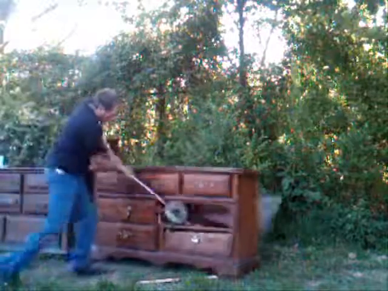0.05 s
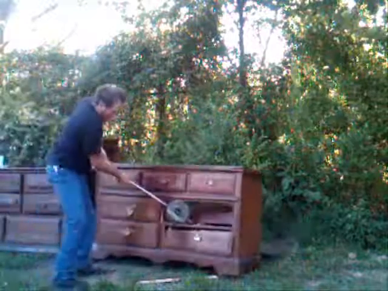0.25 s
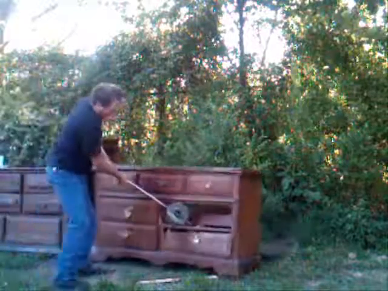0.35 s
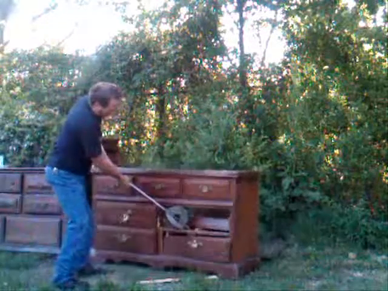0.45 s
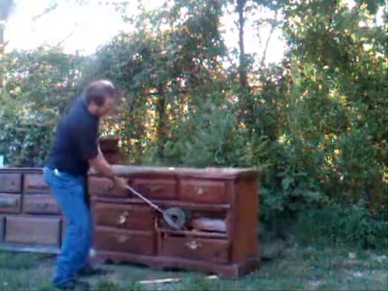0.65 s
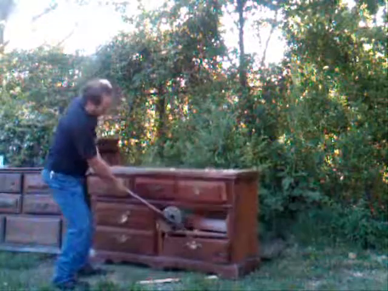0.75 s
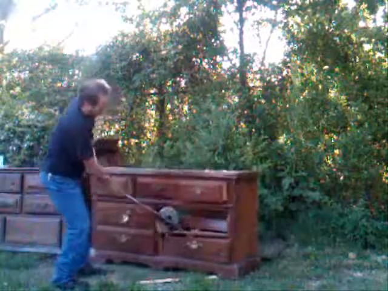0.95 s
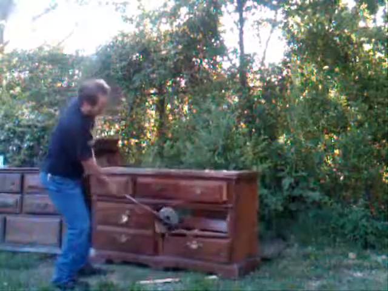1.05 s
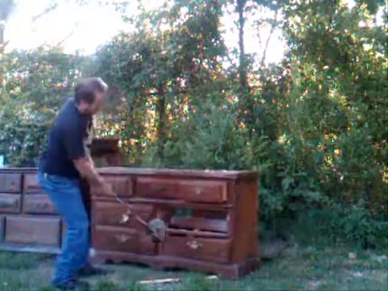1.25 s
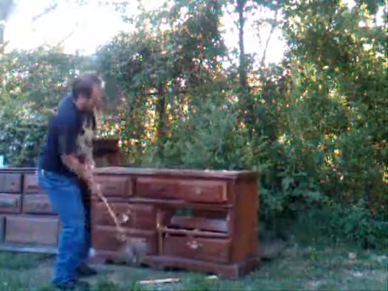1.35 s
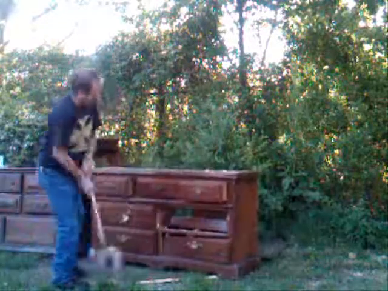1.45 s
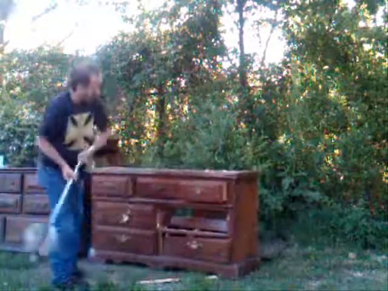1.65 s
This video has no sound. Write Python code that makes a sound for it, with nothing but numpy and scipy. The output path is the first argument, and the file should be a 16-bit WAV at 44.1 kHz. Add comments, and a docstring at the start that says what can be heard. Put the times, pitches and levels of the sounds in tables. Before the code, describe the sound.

At about 0.2 seconds a mace smashes into a wooden dresser with a sharp, splintering crack and a hollow boom. From 0.3 to 1.5 seconds the head is worked loose: quieter, uneven scraping with snapping splinters and knocking boards, busiest around 0.8 to 1 second. The steel clinks lightly once near 1.4 seconds. The backyard behind is very quiet.

```python
"""Steel mace on a wooden dresser

A mace smashes into a dresser in a backyard: the drawer front fractures in a run of noise bursts,
the panels ring in their modes and the hollow carcass booms. As the head is worked loose it scrapes
by stick-slip friction, splinters snap, boards knock and the steel clinks once.
A short echo follows the dresser's sounds; a faint bird and a low mains hum lie behind."""
import sys
import numpy as np
from scipy import signal
from scipy.fft import rfft, irfft, next_fast_len
from scipy.io import wavfile
from scipy.ndimage import uniform_filter1d, map_coordinates

SR = 44100
rng = np.random.default_rng(int(sys.argv[2]) if len(sys.argv) > 2 else 0)


def wav_record(signal):
    """Record a signal, one row per channel, as 16-bit PCM in the file named by sys.argv[1]."""
    frames = np.transpose(np.atleast_2d(signal))
    bounded = np.clip(frames, -1, 1)
    # unit amplitude maps onto the largest positive 16-bit level
    quanta = np.round(bounded * 32767).astype(np.int16)
    wavfile.write(sys.argv[1], SR, quanta)


N = 74970
T = np.arange(N) / SR

# wood fracturing under the blow: start_s, level_db, treble_db, t60_s
FRACTURES = [(0.1963, -49.5, -12, .07), (0.1983, -47, 4, .05), (.2016, -28.5, -12, 0.047),
             (0.2036, -22, 8, 0.048), (0.209, -27, 8.5, 0.02), (.214, -36.5, -8.5, .07),
             (0.2208, -37, -4, 0.039), (.227, -29.5, -4.5, 0.054), (0.233, -41.5, 5.5, .07),
             (0.242, -40.5, -21.5, 0.12), (0.25, -44, 7, 0.074), (.265, -38.5, -3, 0.096),
             (0.272, -49.5, 17, 0.03), (.285, -48, -15, 0.085), (.307, -46, -21, 0.048)]
# modes of the dresser panels: pitch_hz, relative_db, t60_s
PANEL_MODES = [(190.7, -3, 0.25), (240.6, -5, .3), (804, -1, .3), (895, -5, 0.29), (1085, -5.5, 0.12),
               (1152, -12, .22), (1238, -5.5, 0.27), (1612, 1.5, 0.29), (1894, -3, .18), (2029, -11.5, .22),
               (2280, 4, 0.25), (2560, -11, .2), (2810, -9, 0.44), (2890, -13.5, 0.14), (3660, -4, 0.29),
               (4620, 1.5, 0.18), (4700, -10, .14), (5140, -3, 0.094)]
# booms of the carcass: start_s, level_db, pitch_hz, t60_s
THUMPS = [(.202, -42, 200, 0.067), (0.225, -31.5, 112, 0.06), (0.227, -41, 190, 0.21),
          (0.344, -54, 161, 0.08), (0.434, -69, 168, 0.071), (0.464, -53, 218, 0.13),
          (0.516, -57, 224, 0.15), (0.552, -54.5, 110, 0.14), (0.831, -51.5, 195, 0.25),
          (.885, -45, 165, .09), (1.059, -63, 61.4, 0.18), (1.191, -65, 187, .15), (1.227, -53, 220, 0.12),
          (1.232, -65, 59.5, 0.21), (1.334, -65, 178.3, .15), (1.253, -56, 177, 0.087),
          (1.284, -56.5, 201, 0.14), (1.443, -47, 215, 0.035)]
# loose boards knocking: start_s, level_db, centre_hz, t60_s
KNOCKS = [(0.024, -52, 1890, 0.007), (.208, -40.5, 395, 0.064), (.272, -35, 2600, 0.035),
          (.3302, -45, 1550, .045), (.3302, -48, 3000, .045), (.427, -49, 910, 0.068),
          (0.496, -43, 2170, 0.015), (.497, -52.5, 485, 0.27), (.517, -52.5, 520, 0.12),
          (0.659, -56, 415, .08), (0.67, -43, 1550, 0.031), (0.687, -45.5, 1440, 0.059),
          (.691, -49.5, 950, 0.047), (.715, -52, 2480, 0.049), (0.761, -56, 2400, .05),
          (.783, -57.5, 1280, 0.15), (.830, -42.5, 2650, 0.063), (0.841, -48.5, 1120, 0.084),
          (.885, -50.5, 470, 0.084), (.967, -49, 1180, 0.12), (0.981, -46, 1400, 0.057),
          (.984, -45, 2300, 0.045), (.9855, -52, 3200, 0.048), (0.991, -45, 1180, 0.036),
          (1.013, -55, 1390, .05), (1.005, -57, 680, 0.17), (1.007, -58.5, 378, 0.29),
          (1.078, -55, 1350, .08), (1.082, -61, 850, .09), (1.243, -49.5, 975, 0.056),
          (1.265, -52, 970, 0.068), (1.306, -55.5, 1190, 0.034), (1.332, -56.5, 2350, 0.031),
          (1.344, -60.5, 450, 0.11), (1.4207, -55, 2570, 0.031), (1.424, -57, 926, 0.14),
          (1.440, -61, 430, 0.12), (1.448, -50, 920, 0.047), (1.501, -52, 1830, 0.025)]
# splinters snapping: start_s, level_db, treble_db
SNAPS = [(.392, -57, -4), (0.424, -47, 5), (0.437, -54, -21), (.446, -53, 1), (.469, -44.5, 1),
         (.477, -65.5, 2), (0.489, -49, 5.5), (0.512, -48, -1), (0.565, -55, -7), (.609, -52, -4),
         (.723, -58, 1), (.830, -45, -5.5), (.837, -51, -2), (.859, -49.5, 9), (0.873, -49, -6),
         (0.9436, -47, 5), (.956, -54, -6), (1.044, -66, 3), (1.063, -58.5, 1), (1.111, -82, 11),
         (1.179, -63, 0), (1.186, -63, 1), (1.203, -65, 2), (1.228, -49.5, 11), (1.236, -47, 2),
         (1.244, -52, 6), (1.252, -67, 5), (1.270, -50, -3), (1.355, -54.5, -3), (1.393, -56, -1),
         (1.422, -52, 4), (1.441, -58.5, 23), (1.4855, -54.5, 7.5), (1.500, -59, -6), (1.533, -59.5, 2)]
# modes of the mace head: pitch_hz, level_db, t60_s
STEEL_MODES = [(3400, -62, 0.12), (6500, -66, 0.28), (6700, -65.5, 0.31)]
# envelopes of the scrape, the swing and the hum: time_s, relative_db
SCRAPE_ENVELOPE = [(.21, -63), (.28, -53), (.32, -59), (.37, -60.5), (.415, -58.5), (.44, -50.5),
                   (.52, -54), (.59, -61), (.65, -63.5), (.71, -62), (.745, -66), (.81, -60), (.85, -58),
                   (.89, -55), (.93, -60.5), (.99, -57), (1.05, -66.5), (1.09, -62.5), (1.16, -70.5),
                   (1.19, -57.5), (1.22, -66.5), (1.255, -57), (1.30, -64), (1.40, -67), (1.45, -61.5),
                   (1.48, -72), (1.56, -72), (1.61, -104)]
SWING_ENVELOPE = [(0, -89), (.08, -86.5), (.13, -74), (.175, -78.5), (.195, -119)]
HUM_ENVELOPE = [(0, -1), (1.45, -5), (1.6, -11)]
# spectra of breaking wood, splinters, rubbing and yard air: frequency_hz, relative_db
FRACTURE_SPECTRUM = [(80, -8), (230, -2.5), (310, -1.5), (520, -6.5), (1000, -0.5), (2000, 0), (2600, 1.5),
                     (3900, -4), (4700, -4), (5500, -4), (7000, -3)]
SPLINTER_SPECTRUM = [(80, -17), (250, 2), (1000, -11), (2500, -1.5), (3800, -8.5), (5000, -9.5),
                     (7200, -12.5)]
RUBBING_SPECTRUM = [(40, -6), (65, -4.5), (100, 1), (180, 8), (300, 5), (500, 3.5), (1300, 2.5), (2400, -1),
                    (3800, -6), (5000, -5), (7200, -9)]
AIR_SPECTRUM = [(25, -6), (60, 4), (130, -11), (300, -13.5), (600, -22), (1300, -19.5), (3000, -20.5),
                (7200, -21)]
# decay of the echo: frequency_hz, t60_s
ECHO_DECAY = [(150, 0.39), (1500, 0.23), (7000, 0.31)]
# harmonics of the mains: pitch_hz, relative_db
HUM_HARMONICS = [(59.5, -77), (119, -73), (178.5, -79), (238, -88)]
# bird chirps: start_s, length_s, from_hz, to_hz, level_db
CHIRPS = [(0.037, 0.044, 2470, 2010, -79.5), (.155, 0.014, 2250, 2400, -96.5)]

TREBLE_HZ, TOP_HZ = 3240, 7350  # where the treble begins; upper band limit


def smash(panel_db=-45.5):
    """Brittle fracture: the drawer front fails in quick bursts that excite the panel modes."""
    out = np.zeros(N)
    for start_s, db, treble_db, t60 in FRACTURES:
        add(out, start_s, amp(db) * crack(FRACTURE_SPECTRUM, treble_db, t60))
    add(out, FRACTURES[1][0], amp(panel_db) * ring(PANEL_MODES))
    return out


def carcass():
    """Damped oscillation: each shove makes the hollow body boom at one low pitch."""
    out = np.zeros(N)
    for start_s, db, hz, t60 in THUMPS:
        add(out, start_s, sine(hz, db) * fade(T, t60) * rise(T, attack_s=.0021))
    return out


def boards(q=4.5):
    """Resonance: each knocked board filters a noise burst around its own natural frequency."""
    out = np.zeros(N)
    for start_s, db, hz, t60 in KNOCKS:
        def response(f):
            resonance = 1j * f / (hz * hz - f * f + 1j * f * hz / q)
            return resonance / (1 + (f / (2.1 * hz)) ** 2)
        add(out, start_s, amp(db) * burst(response, t60))
    return out


def splinters():
    """Sudden release of strain: splinters snap as the head is pulled."""
    out = np.zeros(N)
    for start_s, db, treble_db in SNAPS:
        add(out, start_s, amp(db) * crack(SPLINTER_SPECTRUM, treble_db, t60=.042))
    return out


def scrape(slips_per_s=810, steady_rub=.76, gain_db=1.5):
    """Stick-slip friction: uneven puffs of noise ride on a finer rubbing, and the treble flickers."""
    slips = rng.random(N) < slips_per_s / SR
    slips = slips * amp(1.5 * np.minimum(rng.exponential(size=N), 4))  # sizes span 6 dB
    puff = fade(T[:SR // 50], t60=.0097)
    slip_envelope = np.sqrt(np.abs(signal.fftconvolve(slips ** 2, puff ** 2)[:N]))  # energies add
    rub = patchy(rng.standard_normal(N) * np.hypot(unit(slip_envelope), steady_rub))
    rub = coloured(rub, RUBBING_SPECTRUM)
    treble = filtered(rub, lambda f: f ** 6 / (f ** 6 + TREBLE_HZ ** 6))
    rub = unit(rub - treble + treble * amp(1.9 * wobble(knots_per_s=60.06)))
    in_contact = T > SCRAPE_ENVELOPE[0][0]
    return amp(gain_db) * level(SCRAPE_ENVELOPE) * rub * in_contact


def clink(start_s=1.356):
    """Free vibration: the steel head rings once in its high modes."""
    out = np.zeros(N)
    add(out, start_s, ring(STEEL_MODES))
    return out


def echo(x, gain_db=-12):
    """Scattering: the cabinet and the fence return a short tail whose decay depends on frequency."""
    hz, t, bands = signal.stft(rng.standard_normal(SR // 2), SR, nperseg=256)
    tail = signal.istft(bands * fade(t, along(ECHO_DECAY, hz)[:, None]), SR, nperseg=256)[1]
    tail = np.pad(tail / np.linalg.norm(tail), (SR // 200, 0))  # 5 ms delay
    return amp(gain_db) * signal.fftconvolve(x, tail)[:N]


def swing():
    """Shaped noise: a thin, airy hiss swells before the blow."""
    hiss = coloured(rng.standard_normal(N), [(500, 2), (3300, -13), (6500, 9)])
    return level(SWING_ENVELOPE) * unit(hiss)


def mains_hum(waver_db=2.5):
    """Harmonic series: multiples of the mains frequency waver and fade together."""
    waver = amp(waver_db * wobble(knots_per_s=7.1))
    harmonics = sum(sine(hz, db, rng.random()) for hz, db in HUM_HARMONICS)
    return waver * level(HUM_ENVELOPE) * harmonics


def yard_air(level_db=-75.5):
    """Ambient noise: quiet, steady air, strongest in the bass."""
    return amp(level_db) * unit(coloured(rng.standard_normal(N), AIR_SPECTRUM))


def bird():
    """Frequency sweeps: each far chirp is a sine gliding under a smooth window."""
    out = np.zeros(N)
    for start_s, length_s, from_hz, to_hz, db in CHIRPS:
        n = round(length_s * SR)
        phase = 2 * np.pi * np.cumsum(np.linspace(from_hz, to_hz, n)) / SR
        add(out, start_s, amp(db) * 2 * np.hanning(n) * np.sin(phase))
    return out


def crack(spectrum, treble_db, t60):
    """Broadband transient: a burst with a treble shelf and thinned bass."""
    def response(f):
        shelf_db = treble_db * f ** 4 / (f ** 4 + TREBLE_HZ ** 4)
        return amp(along(spectrum, f) + shelf_db) * f / np.hypot(f, 140)
    return burst(response, t60)


def burst(response, t60, grain_db=2.5):
    """Acoustic emission: a dying cluster of fibre ticks, coloured by a frequency response."""
    t = T[:SR // 4]
    noise = rng.standard_normal(len(t))
    grain = np.repeat(rng.standard_normal(len(t)), SR // 1000)[:len(t)]  # steps every millisecond
    envelope = fade(t, t60) * rise(t, attack_s=.00047)
    ticks = filtered(noise * amp(grain_db * grain), lambda f: response(f) * (f < TOP_HZ)) * envelope
    return ticks * np.linalg.norm(envelope) / np.linalg.norm(ticks)


def ring(modes):
    """Modal superposition: a struck object sounds as a sum of decaying sines."""
    partials = sum(sine(hz, db, rng.random()) * fade(T, t60) for hz, db, t60 in modes)
    return partials * rise(T, attack_s=.001)


def patchy(x, depth_db=2.5):
    """Moving contact: each new point of contact favours other frequencies."""
    bands = signal.stft(x, nperseg=256)[2]
    patches = uniform_filter1d(rng.standard_normal(bands.shape), size=4, axis=0)  # across frequency
    patches = uniform_filter1d(patches, size=6, axis=1)  # across time
    return signal.istft(bands * amp(depth_db * unit(patches)), nperseg=256)[1][:N]


def sine(hz, rms_db, phase_cycles=0):
    """Simple harmonic motion."""
    return amp(rms_db) * np.sqrt(2) * np.sin(2 * np.pi * (hz * T + phase_cycles))


def fade(t, t60):
    """Exponential decay by 60 dB in t60 seconds."""
    return np.exp(-np.log(1000) * t / t60)


def rise(t, attack_s):
    """Exponential approach to full amplitude."""
    return 1 - np.exp(-t / attack_s)


def wobble(knots_per_s):
    """Spline interpolation through random knots."""
    return map_coordinates(rng.standard_normal(SR // 100), [knots_per_s * T], mode="mirror")


def level(points):
    """Amplitude envelope through (time_s, level_db) points."""
    return amp(np.interp(T, *np.transpose(points)))


def along(points, hz):
    """Interpolation of (frequency_hz, value) points on a logarithmic frequency axis."""
    frequencies, values = np.transpose(points)
    return np.interp(np.log(hz + 1), np.log(frequencies + 1), values)


def coloured(x, spectrum):
    """Spectral shaping by (frequency_hz, relative_db) points, up to the band limit."""
    return filtered(x, lambda f: amp(along(spectrum, f)) * (f < TOP_HZ))


def filtered(x, response):
    """Linear filtering: the spectrum of x times a frequency response."""
    size = next_fast_len(len(x) + 4096)
    return irfft(rfft(x, size) * response(np.fft.rfftfreq(size, 1 / SR)), size)[:len(x)]


def amp(db):
    """Decibels to amplitude ratio."""
    return 10 ** (np.asarray(db) / 20)


def unit(x):
    """Normalisation to an rms of 1."""
    return x / np.sqrt(np.mean(x ** 2) + 1e-20)


def add(out, start_s, x):
    """Superposition of x on out from start_s."""
    part = out[round(start_s * SR):][:len(x)]
    part += x[:len(part)]


def scene():
    """Superposition: the dresser and mace, their echo and the backyard sum to one channel."""
    direct = smash() + splinters() + boards() + clink() + carcass() + scrape()
    return (direct + echo(direct) + yard_air() + mains_hum() + swing() + bird())[None]


def record(dry, ceiling=.125, low_cut_hz=42):
    """Saturation and band limiting: peaks are rounded, deep bass is thinned and high treble is cut."""
    x = dry[0] / (1 + (dry[0] / ceiling) ** 4) ** (1 / 4)
    x = signal.sosfilt(signal.butter(2, low_cut_hz, "high", fs=SR, output="sos"), x)
    return filtered(x, lambda f: 1 / np.sqrt(1 + (f / TOP_HZ) ** 240))[None]


dry = scene()
out = record(dry)
wav_record(out)
```